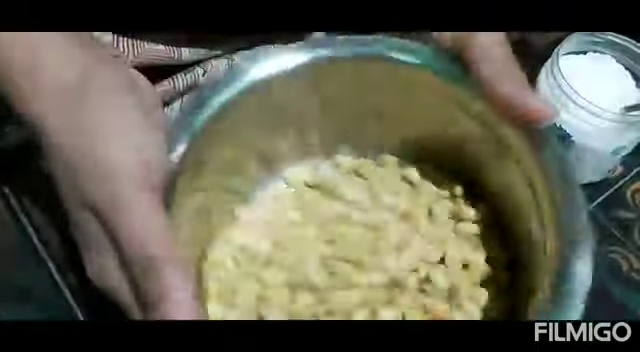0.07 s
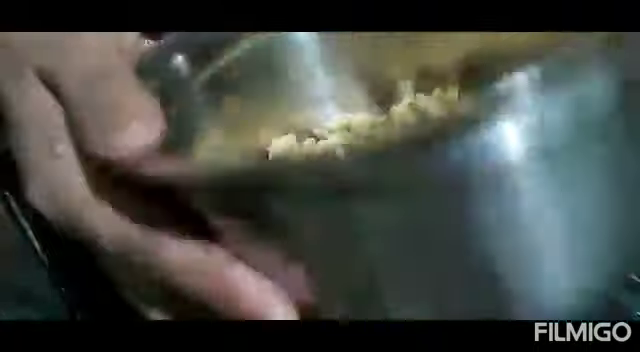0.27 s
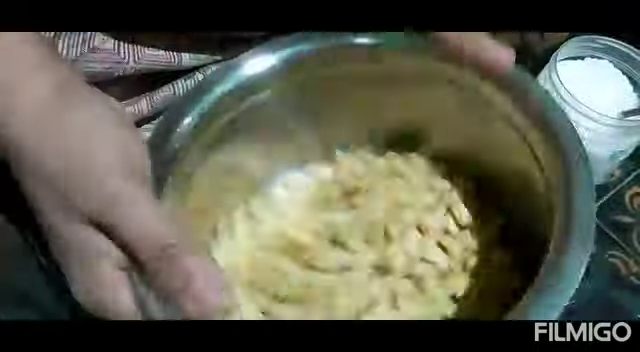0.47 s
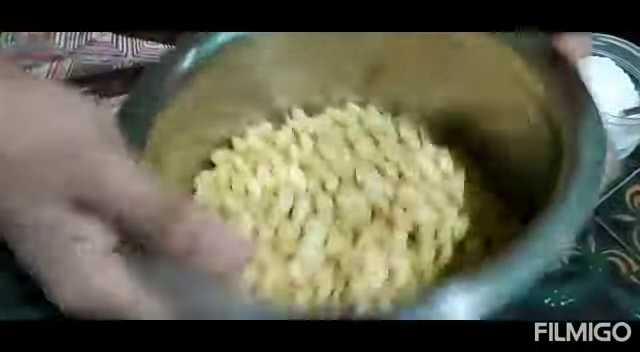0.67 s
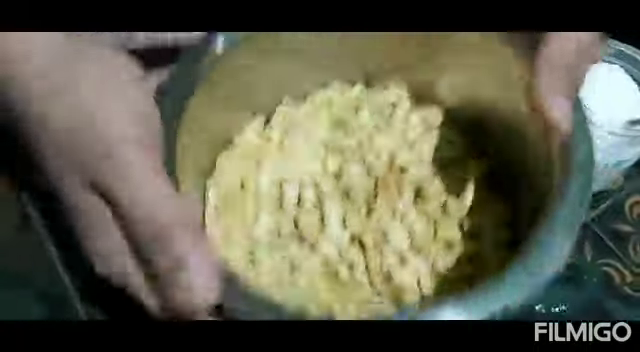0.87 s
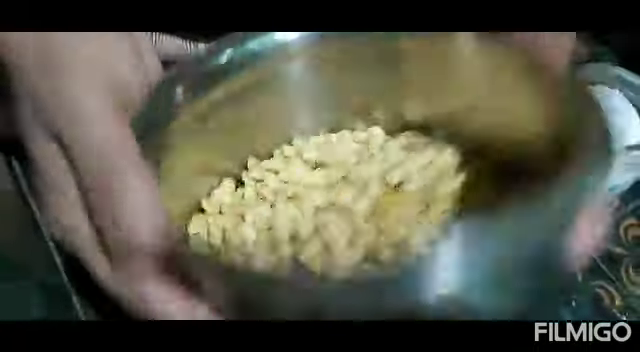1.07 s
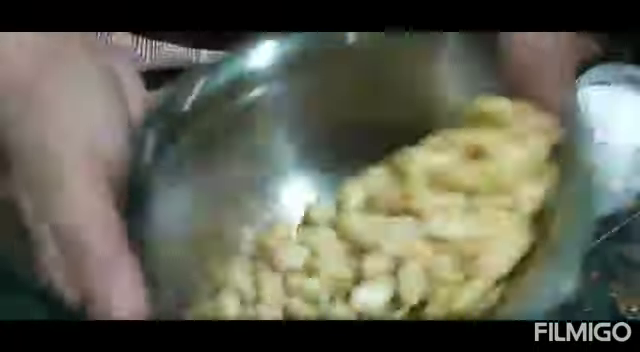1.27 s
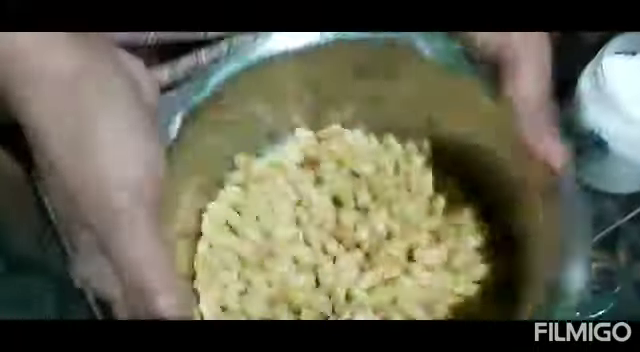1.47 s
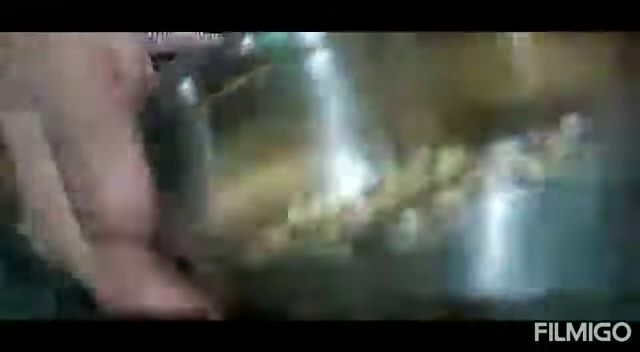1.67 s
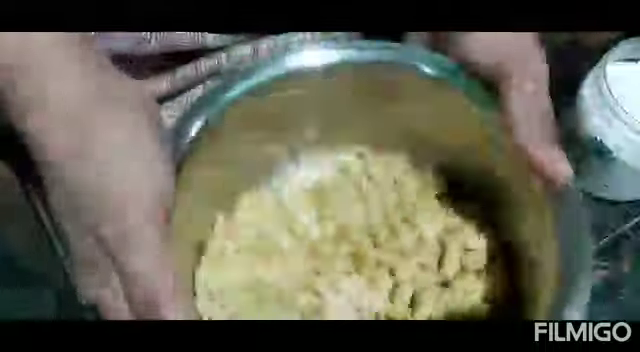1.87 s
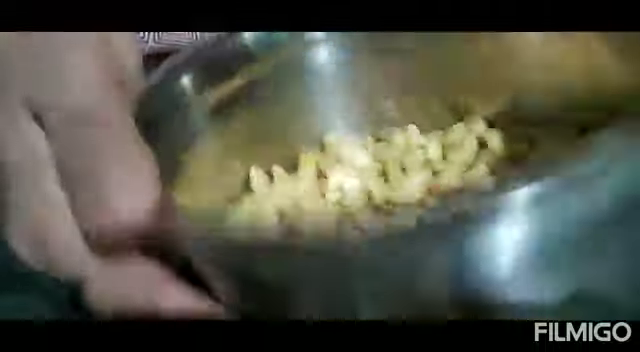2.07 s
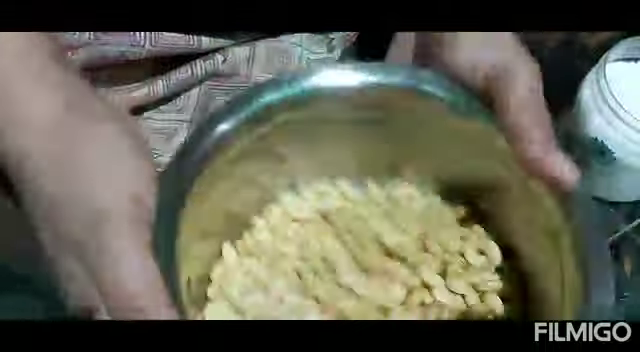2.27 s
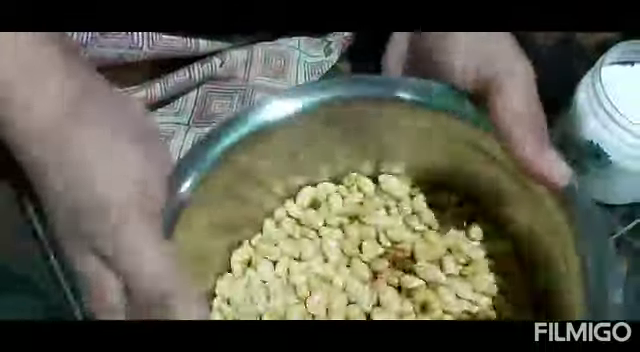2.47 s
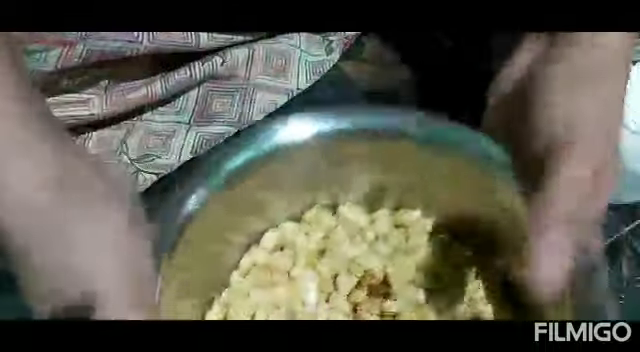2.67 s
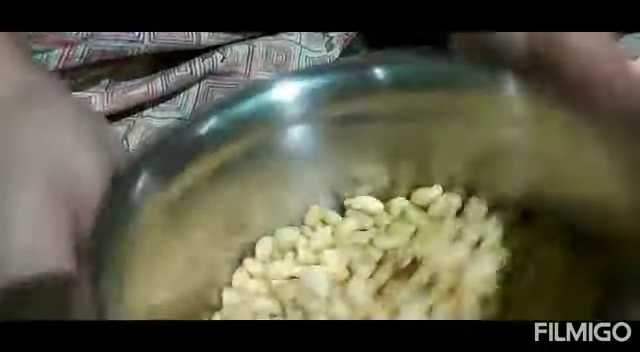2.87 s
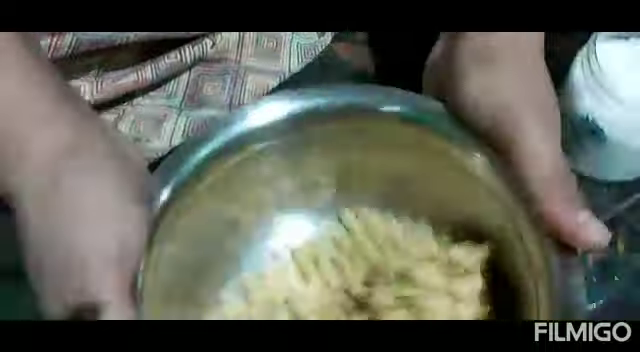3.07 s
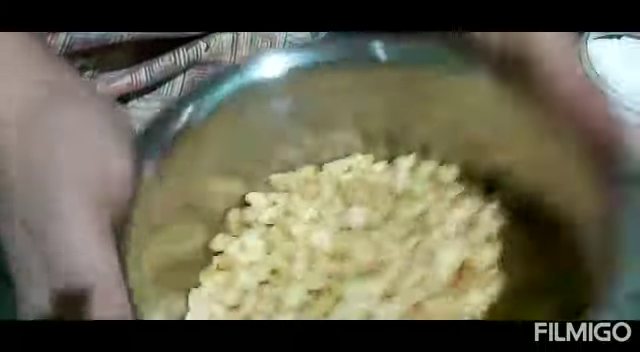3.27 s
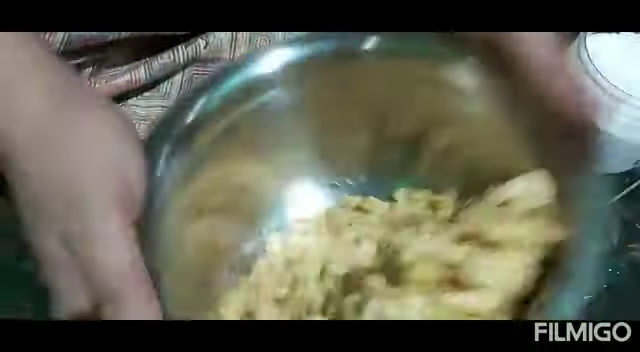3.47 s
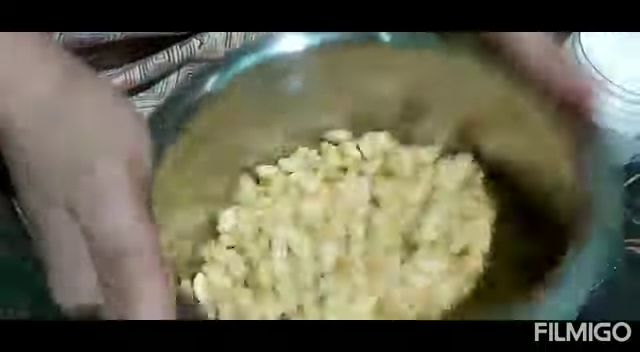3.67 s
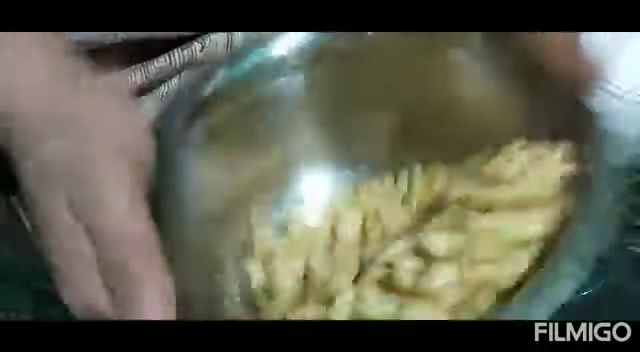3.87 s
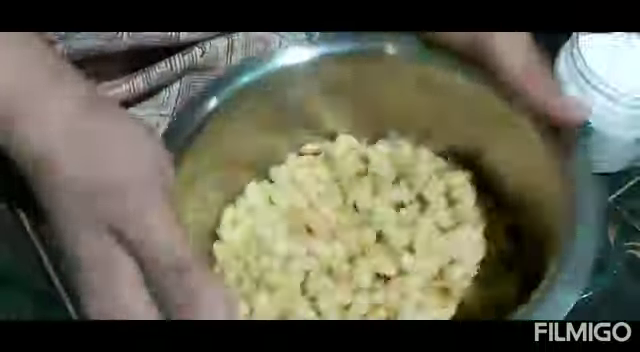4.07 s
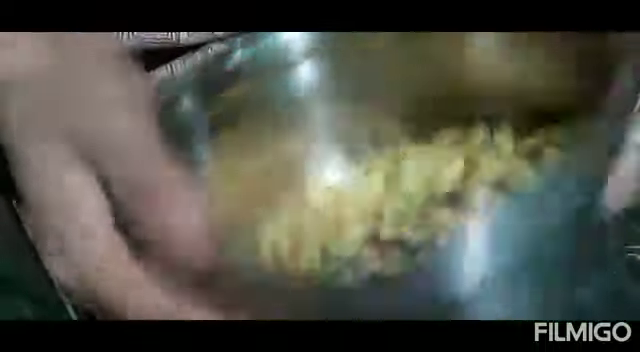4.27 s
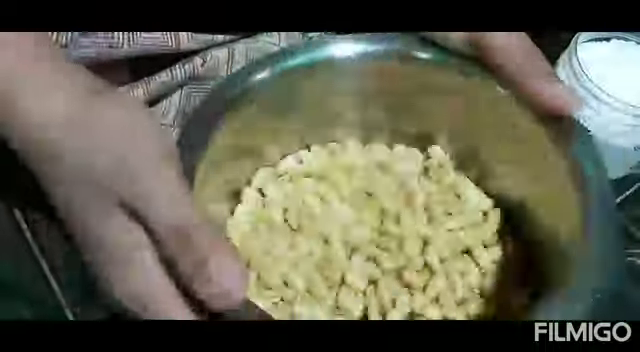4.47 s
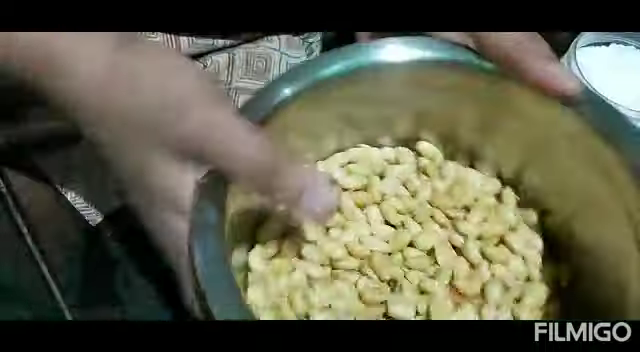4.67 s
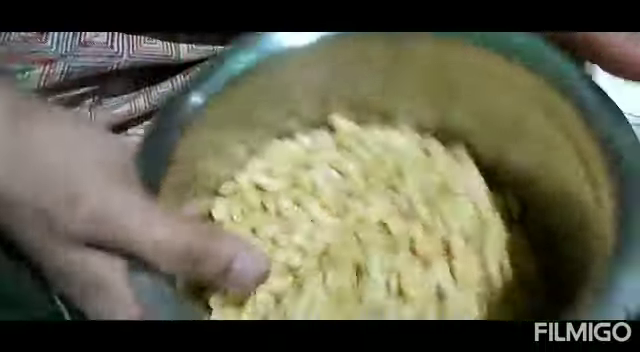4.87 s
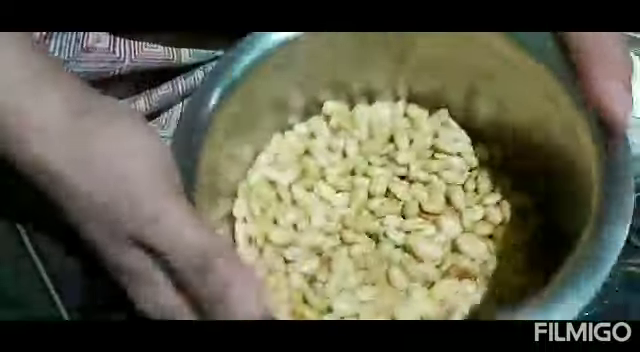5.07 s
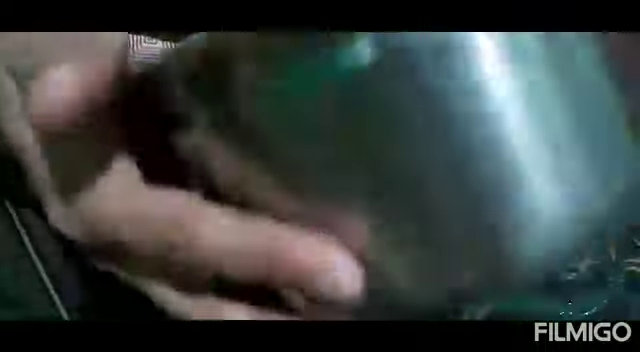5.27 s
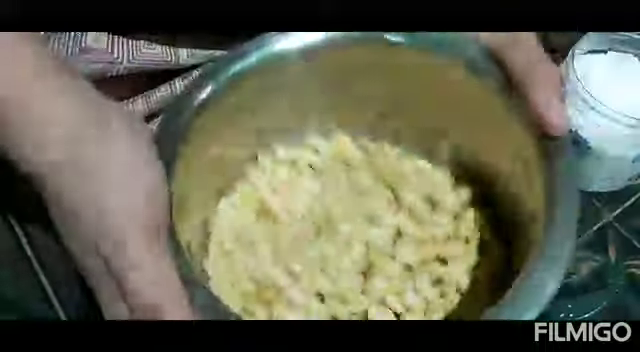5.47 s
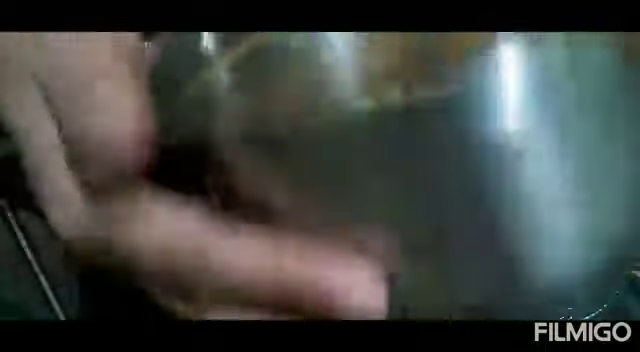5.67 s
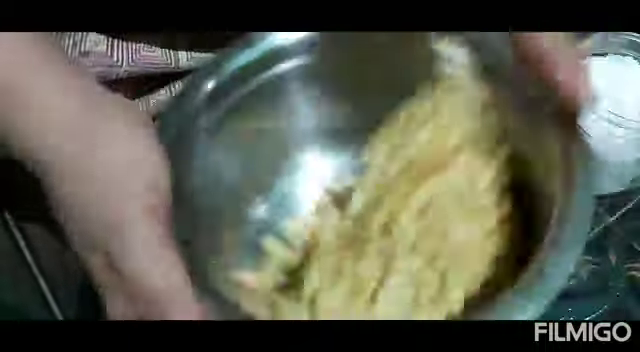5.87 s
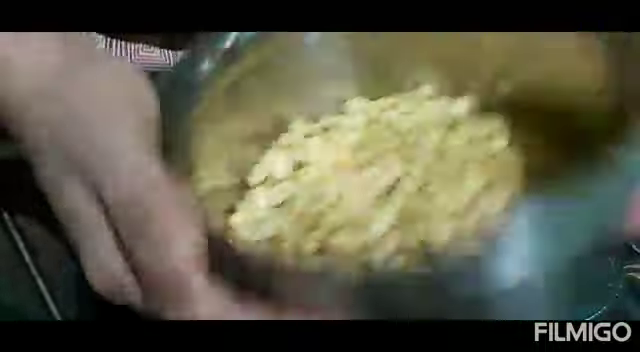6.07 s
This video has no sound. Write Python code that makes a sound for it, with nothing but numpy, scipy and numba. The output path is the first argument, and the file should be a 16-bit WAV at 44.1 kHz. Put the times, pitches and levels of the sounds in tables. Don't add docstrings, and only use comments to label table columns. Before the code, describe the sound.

A close phone microphone in a small, quiet kitchen catches fried beans tossed in a thin steel bowl. Two hard, bright showers land at about 0.2 and 0.6 s, with a hollow bowl ring and sharp glass bangle clinks trailing to 0.7 s. A lull follows with small clinks and a faint rub. Three more crashes come near 1.5, 1.9 and 2.35 s, bangles jingling between them, then faint settling and a soft thump around 2.8 s. Tosses resume at 3.2 s, where the rim bumps a palm with a dull knock, then 3.65, 4.05 and 4.5 s, with lively clinks. A few beans slip until 4.7 s; near silence follows, with very faint rim rubbing around 5 s. Last showers burst at 5.55 and 6.0 s, with small clinks between. Rattles are dense, dry and crisp; low room noise and hiss are barely audible.

```python
import sys
import numpy as np
from scipy import signal
from scipy.fft import rfft, irfft, next_fast_len
from scipy.io import wavfile
from scipy.ndimage import uniform_filter1d
from numba import njit

SR = 44100
rng = np.random.default_rng(int(sys.argv[2]) if len(sys.argv) > 2 else 0)


def nominal_scale(level):
    x = np.asarray(level, float) / 20
    return 10 ** x


def waveform_to_disk(signal):
    frames = np.transpose(np.atleast_2d(signal))
    scaled = np.clip(frames, -1, 1) * 32767
    samples = np.round(scaled).astype(np.int16)
    wavfile.write(sys.argv[1], SR, samples)


N = 269892
TIME = np.arange(N) / SR
SIZE = next_fast_len(N + SR // 4)
STEP = 64
SIGNS = rng.choice([-1., 1.], 2 * N + SR)
TOP_HZ = 15900
SING_UNDER_LANDING_DB = -9

# (f/Hz, level/dB per Hz)
CLATTER = [(1760, -37.5), (3000, -17), (3200, -26), (3480, -9), (3900, -6), (4450, -1), (5030, -16),
           (5450, 0.5), (6180, -7), (6780, 3.5), (7440, -2.5), (8100, 1), (10100, -0.5), (11400, 1),
           (15100, -5.5), (16300, -30)]


def beans(landing_db, crackle_db, cavity_db):
    # (f/Hz, level/dB per Hz)
    bowl = [(260, -59.5), (440, -15), (510, -14), (665, -4), (841, -14.5), (1050, -9), (1250, -10),
            (1390, -6.5), (1710, -6.5), (2680, -11), (3140, -16), (3490, -8.5), (4600, -11.5),
            (5980, -23.5), (10100, -120)]
    # (f/Hz, level/dB, t60/s)
    shell_modes = [(586, -11, 0.1), (676, -9, 0.056), (1046, -1.5, 0.16), (1214, -3.5, 0.086),
                   (1498, 5, 0.05), (1510, 6, 0.029), (1833, -18, 0.13), (2030, -7.5, 0.033),
                   (2372, 3, 0.026), (2667, 2.5, 0.06), (2900, 0, 0.08), (3950, -20.5, 0.072)]
    # (t/s, f/Hz)
    cavity_hz = [(.13, 1336), (.3, 1450), (.54, 1331), (.58, 1433), (1.44, 1400), (1.5, 1412), (1.9, 1410),
                 (2.0, 1435), (2.3, 1395), (2.36, 1470), (3.18, 1400), (3.65, 1435), (4.06, 1480),
                 (4.47, 1448), (5.52, 1390), (5.57, 1403), (5.96, 1404), (6.02, 1442)]
    rate_hz = np.clip(2400 * nominal_scale(.2 * (landing_db + 25)), 1400, 4000)
    shake = shower(rate_hz, spread_db=4.)
    blow = shake * nominal_scale(landing_db)
    body = nominal_scale(3.0) * shell(blow, bowl, t60=0.027, tail_db=-17.5, tail_t60=0.34)
    clatter = shower(rate_hz, spread_db=2.0) * nominal_scale(crackle_db + 2.0)
    dry = shell(clatter, CLATTER, t60=0.012, tail_db=-14.5, tail_t60=0.21, shift=0.032)
    for hz, db, t60 in shell_modes:
        body += nominal_scale(db - 37.0) * ring(blow * flutter(6.45, 12) * signs(), hz, t60, drift=0.024)

    note_hz = curves(cavity_hz)[0]
    sing = ring(shake * signs(), note_hz[::STEP], t60=0.057, drift=0.0074)
    sing = sing / uniform_filter1d(sing ** 2, size=900) ** .3
    pitch_hz = note_hz * (1 + 0.00599 * np.repeat(walk(40), STEP)[:N])
    clear = flutter(2.3, 60) * np.sin(2 * np.pi * np.cumsum(pitch_hz) / SR)
    stands_out = np.clip((cavity_db - landing_db - SING_UNDER_LANDING_DB - 1) / 5, 0, 1)
    return body + dry + nominal_scale(cavity_db) * (nominal_scale(-3) * unit(sing) + stands_out * clear)


def shower(rate_hz, spread_db):
    falls = rng.random(N) < rate_hz / SR
    hardness = nominal_scale(spread_db * np.minimum(rng.exponential(size=N), 4))
    size = hardness * flutter(2.4, 110) * rng.choice([-1, 1], N)
    return unit(falls * size / np.sqrt(rate_hz / SR))


def shell(impacts, spectrum, t60, tail_db, tail_t60, shift=.05, count=4):
    t = TIME[:SR // 4]
    decay = nominal_scale(-60 * t / t60) + nominal_scale(tail_db - 60 * t / tail_t60)
    noise = ports(1800.0, (count, len(t)))
    shifts = 1 + shift * np.linspace(-1, 1, count)
    rings = [colour(noise[:, k], np.array(spectrum) * [shifts[k], 1]) for k in range(count)]
    rings = np.stack(rings, axis=1) * decay

    roam = np.repeat(walk(14), STEP)[:N] + .5 * rng.standard_normal(N)
    place = np.clip(count / 2 + roam * count / 3, 0, count - 1).astype(int)
    strikes = rfft(impacts * (place == np.arange(count)[:, None]), SIZE)
    energy = np.mean(np.sum(rings ** 2, axis=-1))
    return irfft(np.sum(strikes * rfft(rings, SIZE), axis=1), SIZE)[:, :N] / np.sqrt(energy)


def motion():
    # (loudest t/s, build-up/s, level/dB)
    sings = [(.118, .012, -26), (.14, 0.014, -25), (.522, 0.0077, -30.5), (0.541, 0.019, -20),
             (.578, 0.037, -28), (.668, 0.053, -37), (1.42, .012, -35), (1.445, 0.029, -32),
             (1.497, 0.068, -29), (1.875, 0.022, -36), (1.9, 0.026, -25), (1.931, 0.033, -24),
             (2.298, 0.0079, -26), (2.385, .02, -33), (3.183, 0.028, -28.5), (3.647, 0.024, -31),
             (4.061, 0.044, -31), (4.465, 0.032, -30), (5.52, 0.031, -28), (5.562, 0.059, -26.5),
             (5.955, 0.014, -28.5), (6.008, 0.066, -18)]
    # (t/s, length/s, level/dB)
    flicks = [
        (.57, .01, -31),
        (1.925, .01, -33),
        (2.3, 0.009, -32),
        (2.44, 0.073, -32.5),
        (2.62, 0.057, -53),
        (4.02, .06, -29),
        (4.49, .01, -32),
        (4.73, 0.012, -37.5),
        (5.5, .01, -40),
    ]
    clump_db = clumps()
    landing_db = together(pile(column=2, step_db=1.5, runout=1) - 1, clump_db - 9.5)
    crackle_db = together(pile(column=3, step_db=11.5, runout=1.14) - 1.0, clump_db)
    sing_db = (crest(*row, step_db=19, rise=500.5, fall=361) for row in sings)
    cavity_db = together(landing_db + SING_UNDER_LANDING_DB, *sing_db)
    jingle_db = together(-23.5 + 0.52 * crackle_db, bursts(flicks, -1, rise=457.5, fall=310))
    return landing_db, crackle_db, cavity_db, jingle_db


def pile(column, step_db, runout):
    # (hardest t/s, build-up/s, landing/dB, crackle/dB, run-out/dB per s)
    tosses = [(.175, 0.044, -22, -16, 161), (0.574, 0.038, -24.5, -17, 137.5),
              (1.497, 0.045, -22, -15.5, 133.5), (1.931, 0.029, -22.5, -18, 122.5),
              (2.348, 0.034, -21.5, -17, 184.5), (3.185, 0.035, -20.5, -15, 124.5),
              (3.647, 0.026, -21, -19.5, 177), (4.062, 0.032, -24, -17, 128.5),
              (4.493, 0.031, -26, -20.5, 156), (5.563, 0.035, -22, -15, 177.5),
              (6.013, 0.037, -24, -17.5, 141)]
    # (start t/s, length/s, landing/dB, crackle/dB)
    lifts = [(.07, 0.053, -52, -43), (.472, 0.016, -52.5, -35.5), (1.362, 0.028, -45.5, -33),
             (1.82, .045, -50.5, -36), (2.238, .045, -49, -36), (3.083, 0.032, -46.5, -34.5),
             (3.545, 0.045, -48, -37), (3.975, 0.047, -48.5, -35), (4.395, 0.086, -45, -38),
             (5.47, .03, -51, -48), (5.88, 0.062, -56, -41)]
    # (start t/s, length/s, landing/dB, crackle/dB)
    slips = [(.665, 0.021, -40.5, -28.5), (.915, 0.055, -49, -46), (1.2, 0.0061, -57.5, -76),
             (1.6, 0.03, -41.5, -34.5), (2.0, 0.027, -30, -23.5), (2.43, 0.012, -38.5, -29.5),
             (2.77, 0.0087, -63, -67), (3.79, 0.04, -45, -37), (4.6, .032, -43, -33.5),
             (4.71, 0.02, -64, -45.5), (5.095, 0.0051, -62, -55.5), (6.05, .01, -32.5, -24),
             (6.085, .04, -33, -44)]
    # (t/s, landing/dB, crackle/dB)
    creep = [(0, -63.5, -60), (.44, -78.5, -83), (.86, -78.5, -77), (1.06, -58, -56.5), (1.3, -64, -73),
             (1.78, -69.5, -71), (2.62, -65.5, -62.5), (2.85, -77.5, -63), (2.98, -77, -60),
             (3.5, -54, -61), (3.9, -66.5, -69), (4.35, -86.5, -82), (4.86, -65, -57), (5.05, -71.5, -69),
             (5.3, -68, -67), (5.44, -64, -56.5), (5.8, -59, -73), (6.12, -55, -63)]
    toss_db = (crest(row[0], row[1], row[column], step_db, rise=636, fall=runout * row[-1], splash_db=3.5)
               for row in tosses)
    lift_db = bursts(lifts, column, rise=451.5, fall=251.5)
    slip_db = bursts(slips, column, rise=226, fall=192.5)
    return together(*toss_db, lift_db, slip_db, curves(creep)[column - 2])


def clumps():
    # (t/s, peak/dB)
    landings = [(0.1381, -7), (0.1424, -6.5), (0.1625, -7.5), (0.1674, -4), (0.1744, -4.5), (0.1894, -2.5),
                (0.5344, -22.5), (0.5467, -4.5), (0.5714, -11.5), (1.4466, -12.5), (1.4514, -14.5),
                (1.4674, -10.5), (1.4814, -2.5), (1.4934, -6.5), (1.5134, -8.5), (1.8834, -23),
                (1.9091, -12.5), (1.917, -5.5), (1.9394, -10.5), (1.9994, -10), (2.0144, -11),
                (2.2974, -18), (2.3136, -9.5), (2.3294, -5.5), (2.3454, -7), (2.3594, -10), (3.1428, -17),
                (3.1644, -5.5), (3.1814, -10.5), (3.1994, -6.5), (3.5992, -21.5), (3.6306, -10),
                (3.6441, 0), (4.0114, -16), (4.0334, -10.5), (4.0592, -0.5), (4.0744, -7), (4.4323, -18),
                (4.4613, -15), (4.4892, -9), (5.4919, -26), (5.5209, -14), (5.5378, -8), (5.5524, -5.5),
                (5.5614, -7.5), (5.5704, -2.5), (5.5914, -10.5), (5.9584, -19), (5.9733, -17),
                (5.9973, -11), (6.0144, -9.5), (6.0494, -15)]
    fall_db_per_s = 1198.5
    return together(*(np.where(TIME >= s, db - 11 - fall_db_per_s * (TIME - s), -150) for s, db in landings))


def crest(s, lead_s, db, step_db, rise, fall, splash_db=0.):
    splash_s = 0.064
    shape = np.interp(TIME - s, [-lead_s, 0, splash_s], [-step_db, 0, -splash_db])
    return db + shape - rise * np.maximum(s - lead_s - TIME, 0) - fall * np.maximum(TIME - s, 0)


def bursts(table, column, rise, fall):
    return together(*(row[column] - rise * np.maximum(row[0] - TIME, 0)
                      - fall * np.maximum(TIME - row[0] - row[1], 0) for row in table))


def together(*layers_db):
    return 10 * np.log10(sum(nominal_scale(2 * db) for db in layers_db))


def bangles(jingle_db):
    # (f/Hz, level/dB, t60/s)
    thick = [(3940, -10, .06), (4220, -3, .12), (4275, -1, .17), (4530, -7, .06)]
    # (f/Hz, level/dB, t60/s)
    middle = [(6120, -10, 0.047), (6505, -4, 0.056), (6810, -4, 0.083), (6910, -3, 0.055),
              (7800, -9, 0.028), (8100, -7, .05), (8400, -7.5, 0.056), (8460, -13.5, .04),
              (9470, -6.5, .04)]
    # (f/Hz, level/dB, t60/s)
    thin = [(10100, -7, .04), (10600, -4, .05), (11080, 0, .06), (11350, -2, .04), (11600, -4, .035),
            (13900, -7, .03), (15400, -10, .02)]
    s, peak_db, thick_db, thin_db = clinks()
    touches = shower(np.full(N, 500.), spread_db=5.5) * nominal_scale(jingle_db)
    out, ticks = np.zeros((2, N)), np.zeros(N)
    for modes, clink_db, touch_db in ((thick, peak_db + thick_db - 2.5, -38.),
                                      (middle, peak_db - 11.5, -34.),
                                      (thin, peak_db + thin_db - 6, -35.)):
        place, size = hits(s, clink_db)
        drift = .006 if modes is thick else .012
        for hz, mode_db, t60 in modes:
            x = touches * signs() * nominal_scale(touch_db)
            for port in x:
                strength = nominal_scale(4.03 * rng.standard_normal(size.shape)) * rng.choice([-1, 1], size.shape)
                np.add.at(port, place, size * strength)
            out += nominal_scale(mode_db) * ring(x, hz, t60, drift)
    place, size = hits(s, peak_db + 6.5, bounce_db=-7.0, spacing_s=0.0016, count=4)
    np.add.at(ticks, place, size)
    return out + shell(ticks, CLATTER, t60=.015, tail_db=-18., tail_t60=.08, shift=.025)


def clinks():
    # (t/s, peak/dB, thin bangle level/dB)
    caught = [(0.051, -29, -8.5), (.1154, -15, -17.5), (.4521, -30, -9), (.473, -27, -17),
              (.5768, -7.5, -5.5), (0.7568, -24, -24.5), (0.9475, -22.5, -23), (1.345, -24.5, -12),
              (1.3642, -25, -5), (1.3842, -18, -30), (1.4024, -23.5, -11), (1.4506, -20, -33),
              (1.918, -9.5, -20), (2.2135, -41, 3), (2.478, -24, 1), (2.509, -27, -25), (2.54, -37, -25),
              (.985, -35, -29), (3.079, -22.5, -4), (3.1424, -21, -23), (3.543, -19.5, -7.5),
              (3.5748, -33, -9), (3.8376, -23.5, -10), (3.9542, -12.5, -19.5), (4.0285, -12, -14),
              (4.6347, -21, -7), (5.5386, -11, -30), (5.5579, -6, -21), (5.8887, -28, -6)]
    # (t/s, peak/dB, thin bangle level/dB)
    light = [(0.164, -4.5, -13.5), (.176, -18, -8), (0.189, -11, 0), (0.2223, -15, -11), (0.6754, -19, -18),
             (0.6855, -9.5, -6), (0.6982, -3.5, -14.5), (1.514, -22.5, 6.5), (1.6146, -12.5, 6),
             (1.671, -17.5, -8), (1.6165, -17.5, -2), (1.623, -23, -7), (2.127, -13, -40),
             (2.265, -22, -11), (2.557, -39, -14), (2.3888, -14, -14), (2.427, -10, -6.5),
             (3.096, -25.5, -5), (3.2004, -15.5, 2), (3.303, -5.5, -4.5), (3.343, -21, -6),
             (3.6452, -9, -21), (3.763, -19, -30), (3.7866, -16, -11), (3.813, -11.5, -8),
             (3.9898, -14.5, -3), (4.057, -9, -10.5), (4.098, -10.5, 1), (4.218, -26.5, -3),
             (4.488, -7, -22), (4.6103, -13, -31), (4.6705, -12, -12), (5.7018, -26.5, -4),
             (5.7902, -32.5, -13)]
    s, peak_db, thin_db = np.transpose(caught + light)
    thick_db = np.where(np.arange(len(s)) < len(caught), -14, -23)
    return s, peak_db, thick_db, thin_db


def hits(s, db, bounce_db=-19.0, spacing_s=0.0048, count=3):
    gaps = (0.49 + rng.random((len(s), count))) * (np.arange(count) > 0)
    late_s = np.cumsum(spacing_s * gaps, axis=1)
    place = np.minimum(((s[:, None] + late_s) * SR).astype(int), N - 1)
    return place, nominal_scale(db[:, None] + bounce_db * np.arange(count))


def hands():
    # (t/s, f/Hz, rms level/dB, length/s)
    thumps = [(0.176, 275, -57.5, 0.15), (0.306, 309, -67.5, 0.046), (0.585, 126, -49.5, 0.052),
              (0.703, 280, -53.5, 0.032), (0.702, 70, -62, 0.054), (0.75, 59.4, -67.5, 0.04),
              (1.523, 200, -48, 0.013), (1.503, 66.5, -71, 0.016), (1.616, 151, -92, 0.034),
              (1.721, 100, -78, 0.066), (2.025, 393, -66.5, 0.21), (2.04, 344, -67, 0.029),
              (2.383, 323, -59.5, 0.072), (2.76, 232, -54, 0.071), (3.245, 264, -48, 0.048),
              (3.285, 220, -47, 0.056), (3.262, 128, -50.5, 0.054), (3.31, 100, -47.5, 0.054),
              (3.235, 415, -57, 0.029), (3.34, 210, -56, 0.04), (3.74, 396, -66, 0.04),
              (3.925, 153, -73.5, 0.11), (4.096, 319, -57.5, 0.069), (4.255, 151, -67, 0.073),
              (4.516, 376, -65.5, 0.16), (4.605, 286, -69, 0.042), (5.656, 228, -68, 0.079),
              (6.093, 303, -60.5, 0.04)]
    # (t/s, f/Hz, rms level/dB, length/s)
    rubs = [(4.9, 1800, -66, .25), (5.0, 1790, -66, .25), (4.9, 1400, -67, .25), (5.1, 1760, -66, .2),
            (5.28, 1750, -69, .3), (5.2, 680, -67, .08), (.95, 650, -60, .1), (1.705, 640, -50, .03),
            (2.18, 620, -55, .03), (1.517, 150, -49, .015), (1.612, 200, -57, .015)]
    return swells(thumps, wobble=0.046, apart=0.59) + swells(rubs, wobble=0.125, apart=0.78)


def swells(table, wobble, apart):
    out = np.zeros((2, N))
    for s, hz, db, length_s in table:
        at = np.flatnonzero(np.abs(TIME - s) < .8 * length_s)
        wander = np.cumsum(rng.standard_normal((3, SR // 2)), axis=1)
        both, left, right = wander[:, :len(at)] * wobble
        sway = uniform_filter1d(both + apart * np.array([left, right]), size=int(SR / hz))
        out[:, at] += nominal_scale(db + 8.5) * np.hanning(len(at)) ** 2 * np.sin(2 * np.pi * hz * TIME[at] + sway)
    return out


def thud(s=3.215, db=-47, fall_db_per_s=110, top_hz=420):
    late_s = np.maximum(TIME - s, 0)
    low = unit(band(ports(300., (N,)), 45, 210))
    high = unit(band(ports(300., (N,)), 180, top_hz))
    decay = nominal_scale(db - fall_db_per_s * late_s - 900 * np.maximum(late_s - .28, 0))
    knock = low * np.minimum(late_s / 0.12, 1) * nominal_scale(0.5) + high
    return np.minimum(late_s / .04, 1) * flutter(6.6, 30) * decay * knock


def rumble(landing_db):
    # (from t/s, to t/s)
    bass_shut = [(.05, .1), (.14, .3), (.455, .56), (.62, .675), (.77, .8), (1.36, 1.49), (1.54, 1.59),
                 (1.64, 1.68), (1.81, 2.09), (2.15, 2.18), (2.25, 2.395), (2.45, 2.48), (2.51, 2.55),
                 (3.07, 3.21), (3.54, 3.76), (4.02, 4.07), (4.12, 4.17), (4.42, 4.66), (5.57, 5.63),
                 (5.96, 6.09)]
    # (f/Hz, level/dB per Hz)
    room_spectrum = [(12, -50.5), (20, -15.5), (38, -14.5), (112, -7.5), (145, -5), (195, -9.5),
                     (367, -4.5), (500, -2.5), (650, -19.5), (1100, -120)]
    shut = sum((TIME > a) & (TIME < b) for a, b in bass_shut)
    room = nominal_scale(-70) * flutter(7.3, 29) * unit(colour(ports(84.0, (N,)), room_spectrum))
    skirt = nominal_scale(landing_db - 25.0) * unit(band(band(ports(400., (N,)), 414, 560), 414, 560))
    return (room + skirt) * uniform_filter1d(1. - np.minimum(shut, 1), size=900)


def kitchen():
    # (f/Hz, level/dB per Hz)
    hiss_spectrum = [(240, -54), (400, 6.5), (744, -1.5), (817, -33), (1150, -8.5), (1360, -12),
                     (2170, -24.5), (3630, -50), (5960, -37.5), (11400, -11.5), (16300, -45)]
    hiss = unit(colour(ports(500., (N,)), hiss_spectrum))
    edges_hz = 480 * 2 ** np.arange(0, 5, .5)
    return nominal_scale(-70.5) * sum(flutter(9.9, 12.0) * band(hiss, hz, hz * np.sqrt(2)) for hz in edges_hz)


def ring(x, hz, t60, drift):
    omega = 2j * np.pi * hz * (1 + drift * walk(15))
    return resonate(x, np.exp((omega - np.log(1000) / t60) / SR), STEP)


@njit
def resonate(x, pole, step):
    y = np.empty(x.shape)
    for port in range(2):
        z = 0j
        for i in range(x.shape[1]):
            z = z * pole[i // step] + x[port, i]
            y[port, i] = z.imag
    return y


def signs():
    start = rng.integers(SR)
    return SIGNS[start:start + 2 * N].reshape(2, N)


def ports(bass_hz, shape):
    mid, left, right = rng.standard_normal((3, *shape))
    b, a = signal.butter(1, bass_hz, fs=SR)
    low = signal.lfilter(b, a, mid)
    return np.array([low + v - signal.lfilter(b, a, v) for v in (left, right)])


def walk(rate_hz):
    k = int(SR / STEP / rate_hz) + 1
    held = np.repeat(rng.standard_normal(N // STEP + 1), k)[:N // STEP + 1]
    return 1.24 * uniform_filter1d(held, size=k)


def flutter(db, rate_hz):
    gain = nominal_scale(db * np.minimum(walk(rate_hz), 1.2))
    return np.interp(np.arange(N), STEP * np.arange(N // STEP + 1), gain)


def curves(table):
    s, *columns = np.transpose(table)
    return [np.interp(TIME, s, c) for c in columns]


def unit(x):
    return x / np.sqrt(np.mean(x ** 2))


def colour(x, spectrum):
    n = x.shape[-1]
    hz, db = np.transpose(spectrum)
    gain = nominal_scale(np.interp(np.log(np.fft.rfftfreq(n, 1 / SR) + 1), np.log(hz), db))
    return irfft(rfft(x) * gain, n)


def band(x, lo_hz, hi_hz):
    return signal.sosfilt(signal.butter(2, (lo_hz, hi_hz), "band", fs=SR, output="sos"), x)


def scene():
    # (f/Hz, left minus right level/dB)
    lean = [(500, -1.5), (2000, 0), (5000, -3), (10000, -1.5), (14000, 0.5)]
    landing_db, crackle_db, cavity_db, jingle_db = motion()
    near = beans(landing_db, crackle_db, cavity_db) + bangles(jingle_db) + kitchen()
    bass_cut = signal.cheby2(10, 70, 400, "high", fs=SR, output="sos")
    left, right = signal.sosfilt(bass_cut, near) + hands() + rumble(landing_db) + thud()
    half_lean = np.array(lean) * [1, .5]
    left = np.roll(colour(left, half_lean), -8)
    return np.array([left, colour(right, half_lean * [1, -1])])


def starve(x, below_db):
    hz, _, z = signal.stft(x, SR, nperseg=2048)
    power = uniform_filter1d(np.mean(np.abs(z) ** 2, axis=0), size=8, axis=0)
    power = power[::8].repeat(8, axis=0)[:len(hz)]
    power = uniform_filter1d(power, size=2, axis=1)
    middle = (hz > 900) & (hz < 6600)
    floor = nominal_scale(2 * below_db) * np.median(power[hz < TOP_HZ], axis=0)
    weak = (power < floor) & middle[:, None]
    return signal.istft(z * ~weak, SR, nperseg=2048)[1][:, :N]


def band_limit(x):
    return signal.sosfilt(signal.butter(12, 16490, fs=SR, output="sos"), x)


def record(dry):
    top_cut = signal.ellip(8, .3, 50, TOP_HZ, fs=SR, output="sos")
    mix = starve(signal.sosfilt(top_cut, dry), below_db=-6.5)
    return band_limit(mix)


dry = scene()
out = record(dry)
waveform_to_disk(out)
```